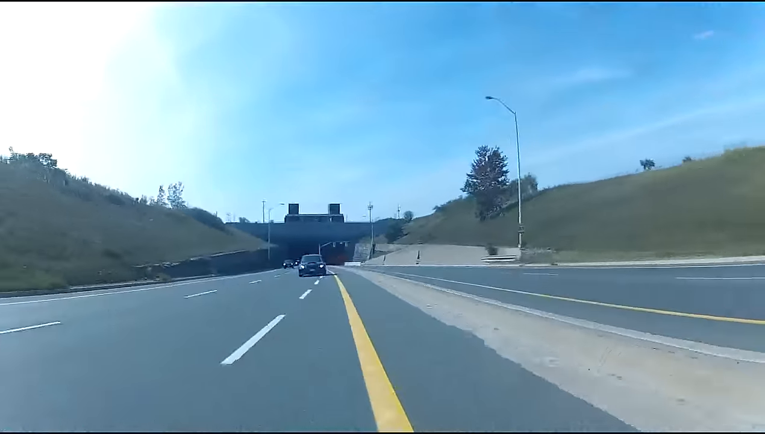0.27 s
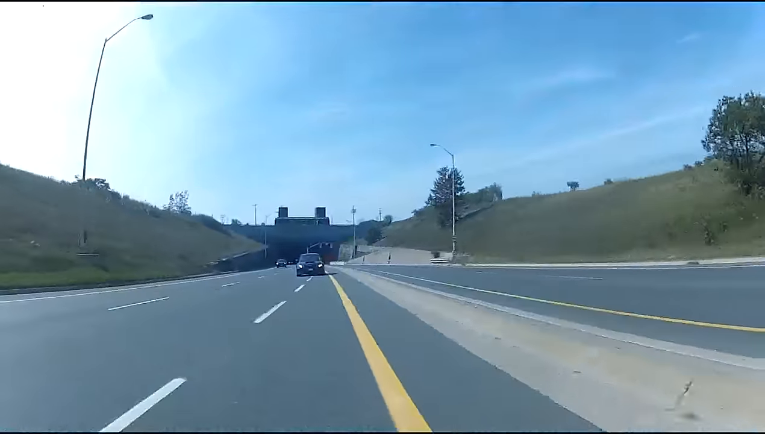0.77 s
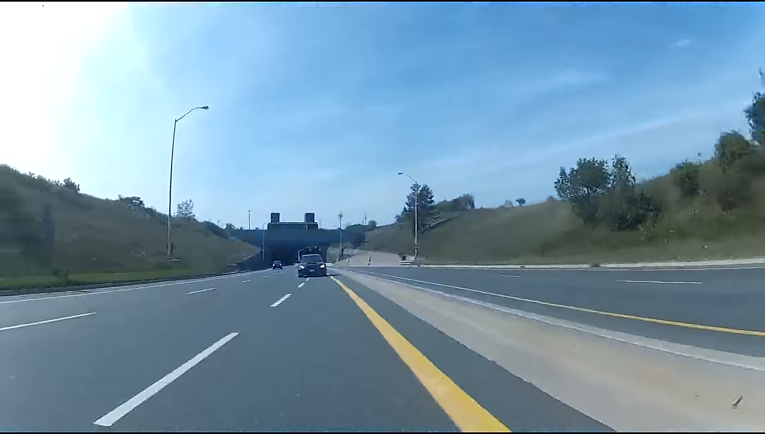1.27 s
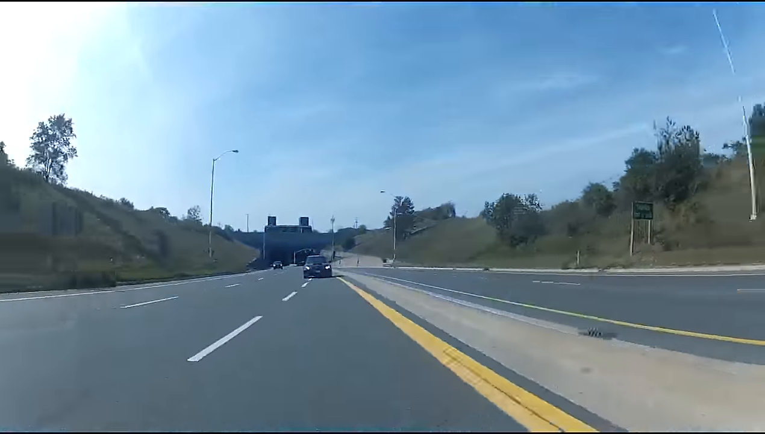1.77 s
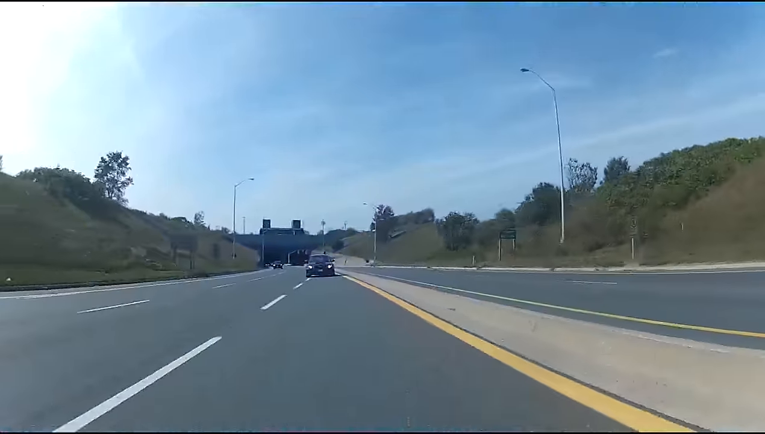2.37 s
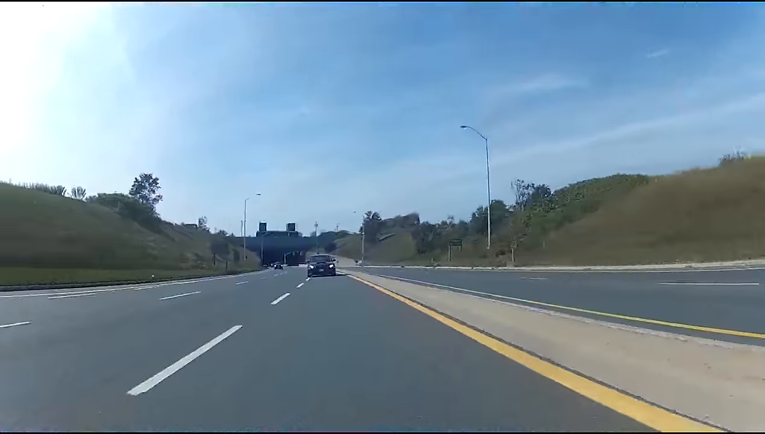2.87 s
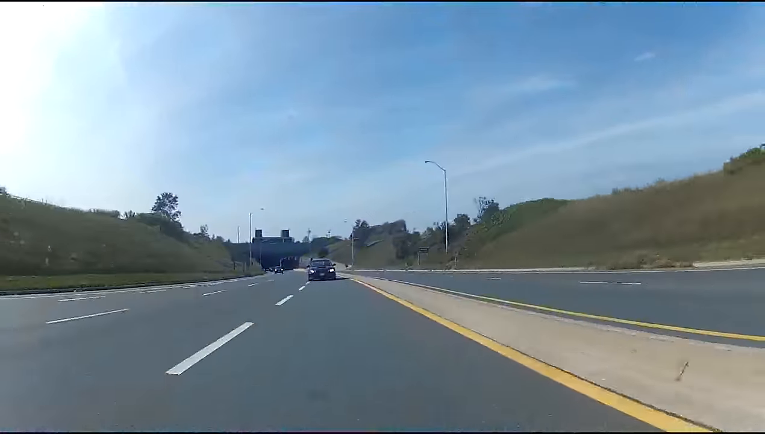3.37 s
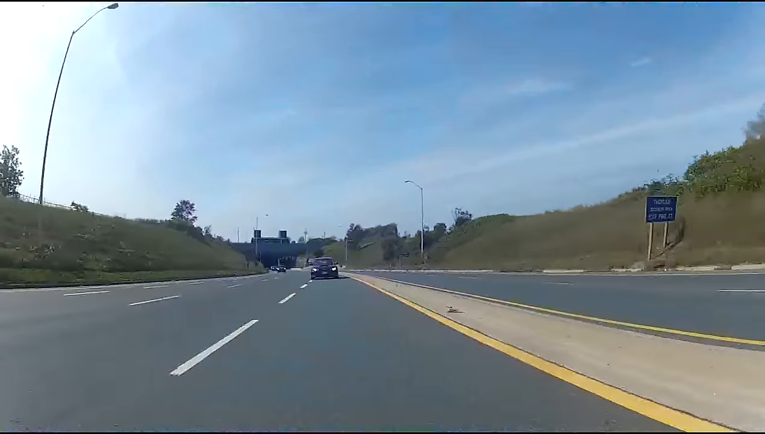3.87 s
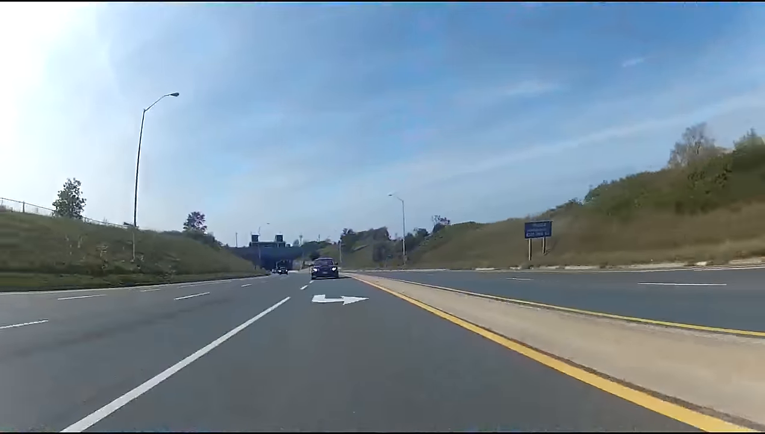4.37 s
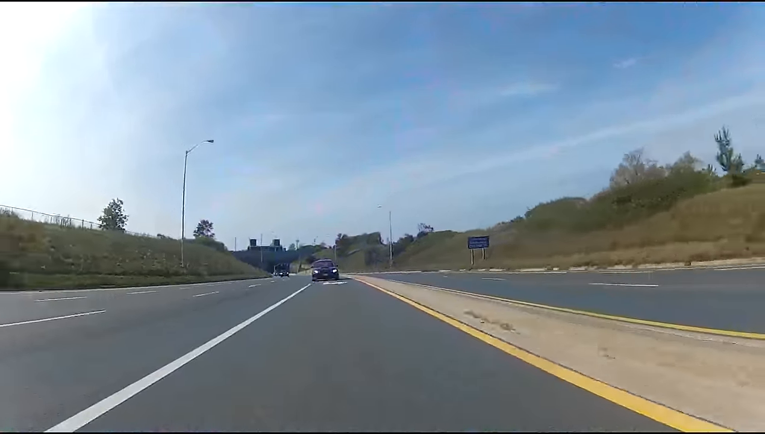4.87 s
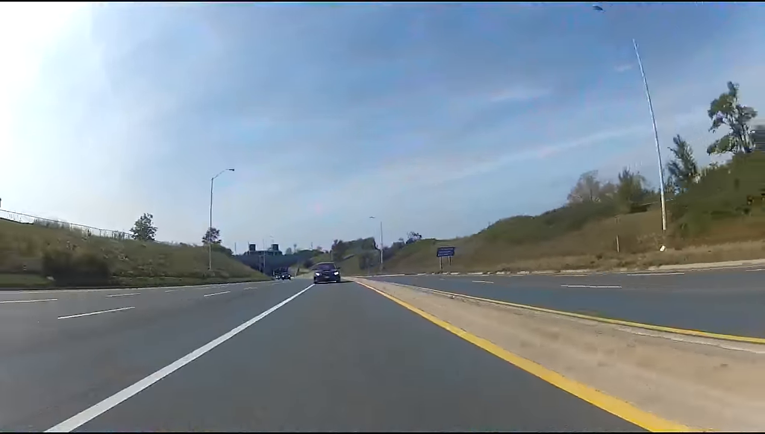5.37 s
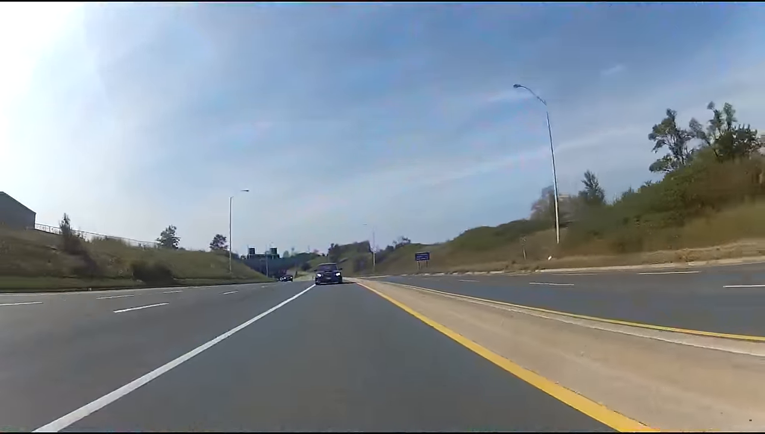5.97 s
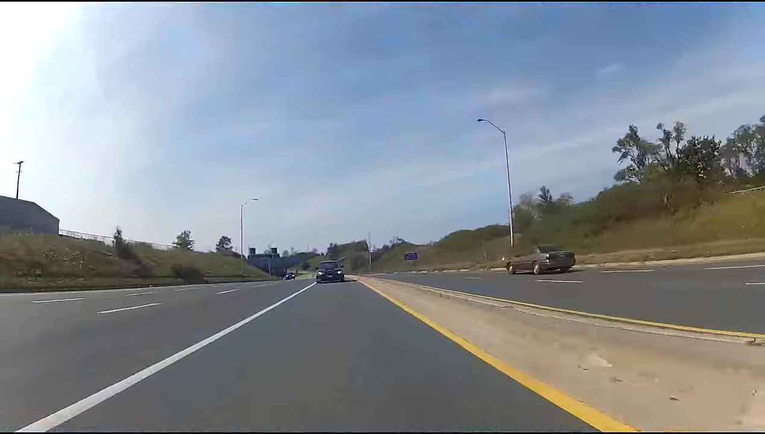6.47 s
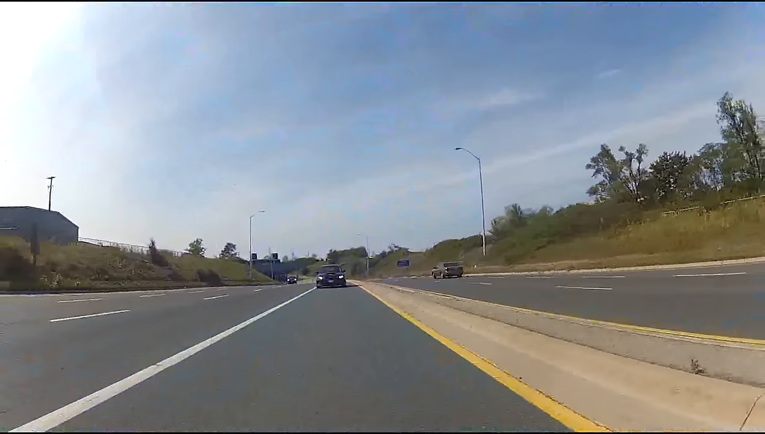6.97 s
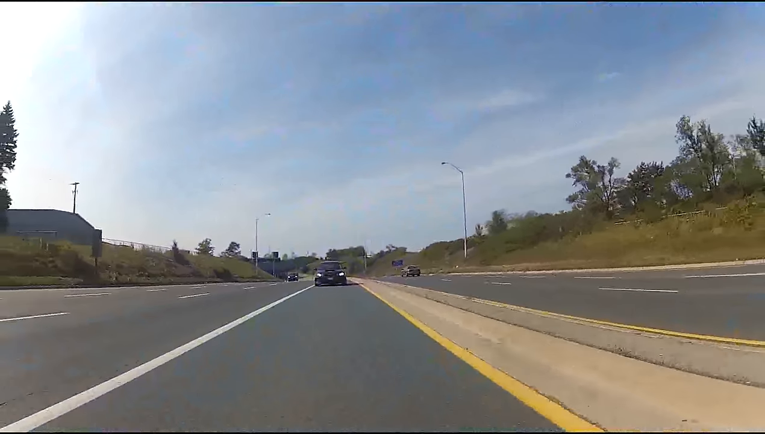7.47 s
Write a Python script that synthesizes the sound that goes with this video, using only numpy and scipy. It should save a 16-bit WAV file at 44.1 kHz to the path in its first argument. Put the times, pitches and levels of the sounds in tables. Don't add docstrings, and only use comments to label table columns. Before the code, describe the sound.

A car slows on a highway: deep buffeting boom, tyre and wind roar, humming engine, hollow exhaust pops, mount rattles, all muffled and gritty.

```python
import sys
import numpy as np
from scipy import signal
from scipy.fft import rfft, irfft, next_fast_len
from scipy.io import wavfile
from scipy.ndimage import uniform_filter1d

SR = 44100
rng = np.random.default_rng(int(sys.argv[2]) if len(sys.argv) > 2 else 0)


def to_wav(s):
    ch = np.atleast_2d(s).T
    pcm = np.round(np.clip(ch, -1, 1) * 32767)
    wavfile.write(sys.argv[1], SR, pcm.astype(np.int16))


def nominal_scale(level):
    x = np.asarray(level, float) / 20
    return 10 ** x


N = 341334
PADDED = next_fast_len(N)
HZ = np.arange(PADDED // 2 + 1) * SR / PADDED

# time in seconds, road speed in m/s.
SPEED = [
    (0, 30),
    (.4, 29.66),
    (1.4, 28.09),
    (1.7, 27.64),
    (2.4, 26.82),
    (3, 26.12),
    (4.15, 23.94),
    (5.15, 21.59),
    (7.15, 14.09),
    (7.74, 11.9),
]
# time in seconds, level in dB, pitch in Hz.
POPS = [(0.108, -24.5, 485), (0.215, -30.5, 506), (0.724, -25.5, 530), (1.029, -28.5, 474),
        (1.185, -27, 600), (1.769, -23, 456), (1.978, -26, 604), (2.063, -26.5, 513), (2.473, -26.5, 473),
        (2.566, -27.5, 470), (3.058, -24, 536), (3.171, -31, 540), (3.547, -28.5, 610), (3.785, -27.5, 496),
        (4.363, -31, 490), (4.708, -27.5, 640), (4.845, -35, 440), (4.884, -28, 649), (4.933, -32.5, 493),
        (4.973, -27.5, 590), (5.059, -27, 750), (5.153, -33.5, 463), (5.3, -26.5, 624)]
# frequency in Hz, level in dB, 60 dB decay in seconds.
SHELL_MODES = [(2330, 12, .013), (2750, 10, .008)]
# frequency in Hz, level in dB, 60 dB decay in seconds.
SHELL_FRONT = [(3200, 4, .005), (3750, 3, .005), (4250, 0, .005)]


def curves(table):
    s, *columns = np.transpose(table)
    return [np.interp(np.arange(N) / SR, s, column) for column in columns]


def walk(rate):
    hold = int(SR / rate)
    steps = np.repeat(rng.standard_normal(N // 200), hold)[:N]
    return 1.3 * uniform_filter1d(uniform_filter1d(steps, hold), hold)


def swells(events, width_s):
    t = np.arange(0, N / SR + .01, .002)
    rise_db = sum(db * np.exp(-((t - s) / width_s) ** 2) for s, db in events)
    return np.interp(np.arange(N) / SR, t, rise_db)


def with_speed(full_db, db_per_db):
    return full_db + db_per_db * 20 * np.log10(curves(SPEED)[0] / SPEED[0][1])


def turbulence(colour, swell_db, flicker_db, flicker_hz):
    hz, db = np.transpose(colour)
    octave, corners = np.log2(HZ + 1), np.log2(hz)
    noise = rfft(rng.standard_normal(PADDED)) * nominal_scale(np.interp(octave, corners, db, -150, -150))
    swell = swell_db * walk(2 * flicker_hz)
    spacing = .75
    out = 0
    for centre in np.arange(4, 14, spacing):
        if corners[0] - spacing < centre < corners[-1] + spacing:
            share = np.cos(np.pi / 2 * np.clip((octave - centre) / spacing, -1, 1)) ** 2
            band = irfft(noise * share)[:N]
            out = out + nominal_scale(swell + flicker_db * walk(flicker_hz)) * band
    return out / out.std()


def ring(push, modes):
    out = 0
    for hz, db, t60 in modes:
        pole = np.exp(2j * np.pi * hz / SR - np.log(1000) / (t60 * SR))
        out = out + nominal_scale(db) * signal.lfilter([1], [1, -pole], push).imag
    return out


def knock(s, db, modes, contact_s):
    push = np.zeros(N)
    push[(np.atleast_1d(s) * SR).astype(int)] = nominal_scale(db)
    shape = np.hanning(int(contact_s * SR) + 3)
    return ring(np.convolve(push, shape / shape.sum())[:N], modes)


def bursts(times, dbs, decay_s, delay_s):
    marks = np.zeros(N)
    marks[((times + delay_s) * SR).astype(int)] = nominal_scale(dbs)
    fade = np.exp(-1 / (decay_s * SR))
    return signal.lfilter([np.sqrt(1 - fade ** 2)], [1, -fade], marks) * rng.standard_normal(N)


def body_boom():
    # frequency in Hz, density in dB per Hz.
    fast_colour = [(12, -32), (30, -6.5), (52, -3), (72, 6.5), (98, -5.5), (125, -2.5), (160, -28.5),
                   (280, -120)]
    # frequency in Hz, density in dB per Hz.
    slow_colour = [(12, -34), (20, -18), (35, -11), (48, -3), (62, -2.5), (80, -19), (110, -7.5),
                   (150, -25)]
    # time in seconds, boom change in dB.
    boom_changes = [(0, 8), (.22, 5), (.48, 7), (.8, 4.5), (1.06, 4.5), (1.2, 2.5), (1.41, 3), (1.58, 2.5),
                    (1.75, 2.5), (1.95, 8), (2.25, 5.5), (2.45, 5), (2.58, 7), (2.8, 3), (3.35, 3.5), (3.55, 4),
                    (3.83, 4.5), (4.21, 5.5), (4.42, 5.5), (4.73, 6), (4.88, -7), (5, 10), (5.13, 1.5),
                    (5.28, 5.5), (5.47, 5.5), (6.3, 0), (6.9, 7), (7.48, 5)]
    sink_below, sink_over = 22.2, 1.9
    slow = .87 * np.clip((sink_below - curves(SPEED)[0]) / sink_over, 0, 1)
    boom = np.sqrt(1 - slow) * turbulence(fast_colour, 0.2, 0.85, 4)
    boom = boom + np.sqrt(slow) * turbulence(slow_colour, .3, 0.92, 4)
    return nominal_scale(with_speed(-24, 1.48) + swells(boom_changes, width_s=0.09)) * boom


def buffeting():
    # frequency in Hz, density in dB per Hz.
    wake_colour = [(60, -15), (95, -3), (140, -0.5), (180, 0.5), (220, -8.5), (260, -19.5), (340, -31)]
    # time in seconds, change in dB.
    rumble_changes = [(.17, 2.5), (.64, 6), (1.36, 1), (2.6, 5.5), (3.08, 6), (3.54, -3.5), (4.33, 3.5), (4.63, 9),
                      (4.89, 4.5), (5.13, 7), (5.3, 3.5), (5.86, 4.5), (6, 2.5), (6.81, -1), (7.48, 8), (7.62, 9)]
    level_db = with_speed(-25, 1.83) + swells(rumble_changes, width_s=0.053)
    return nominal_scale(level_db) * turbulence(wake_colour, 0.24, .6, 5.9)


def tyres_and_wind():
    # frequency in Hz, density in dB per Hz.
    roar_colour = [(450, -24.5), (620, -7), (800, 0), (1050, -0.5), (1250, -3.5), (1430, -3.5),
                   (1700, -13.5), (2400, -44)]
    # frequency in Hz, density in dB per Hz.
    hiss_colour = [(900, -32), (1500, -4), (1950, 0), (2500, -10.5), (3200, -21), (4200, -24),
                   (5400, -32.5), (6000, -45.5)]
    # time in seconds, tyre roar change in dB.
    asphalt = [(.15, 1), (.9, -0.5), (1.2, 1), (1.95, 0.5), (2.65, -1.5), (3.1, 0.5), (3.45, 1), (3.75, -1),
               (4.15, -0.5), (4.55, 0.5), (5.1, 1), (5.6, -0.5), (6.8, 1), (7.2, 1), (7.7, 2.5)]
    asphalt_db = swells(asphalt, width_s=0.16)
    roar = nominal_scale(with_speed(-34.5, 2.25) + asphalt_db) * turbulence(roar_colour, 0.87, 0.8, 12)
    hiss = nominal_scale(with_speed(-39, 2.08) + 0.4 * asphalt_db) * turbulence(hiss_colour, 0.42, 0.57, 14)
    return roar + hiss


def revs():
    high_gear, low_gear = 4.45, 6.6
    shift_s, blip_s, clutch_s, sag_over_s = 1.7, .215, 7.3, .22
    t = np.arange(N) / SR
    engaged = 1 - np.exp(-(np.maximum(t - shift_s, 0) / blip_s) ** 1.4)
    sag_hz = 10 * (1 - np.exp(-(np.maximum(t - clutch_s, 0) / sag_over_s) ** 2))
    return curves(SPEED)[0] * (high_gear + (low_gear - high_gear) * engaged) - sag_hz


def engine():
    # time in seconds, firing line in dB.
    load = [(0, -26), (.4, -24), (.9, -33), (1.4, -28.5), (1.6, -49), (2.3, -38), (2.42, -26.5), (3.2, -22),
            (3.8, -32.5), (4, -26.5), (4.5, -24), (5.2, -24), (5.55, -25.5), (6.05, -41.5), (6.55, -31.5),
            (6.8, -23), (7.3, -27.5), (7.74, -34)]
    # time in seconds, change of the firing line in dB.
    throttle = [(.13, -4.5), (.64, -4), (1.15, -3), (1.87, 17.5), (3.78, -8), (3.88, -2.5), (5.38, -10),
                (5.67, -4), (5.87, 6), (6.26, 7), (6.58, -4), (6.96, -4.5), (7.44, -13), (7.6, 4)]
    # order in fifths of the firing rate, start in seconds, end in seconds, level in dB.
    side_orders = [(2, 2.3, 2.7, -28), (2, 5.3, 6.6, -34), (6, 2.8, 3.5, -37), (9, 3.5, 4.4, -46),
                   (10, 1.77, 1.9, -36), (10, 3.3, 3.9, -48), (10, 4.7, 5.3, -52), (10, 5.3, 6.2, -48),
                   (10, 6.7, 7.74, -48), (11, 5.8, 6.4, -55), (12, 4.8, 5.3, -51), (12, 5.8, 6.9, -49),
                   (14, 2.4, 4.4, -54), (14, 5.2, 7.2, -56), (15, 5.8, 7.45, -48), (15, 6.8, 7.4, -52),
                   (17, 5.2, 5.9, -51), (19, 6, 6.5, -55), (20, 6.1, 6.8, -53), (24, 2.6, 4.1, -54),
                   (27, 5.5, 7.2, -56), (27, 5.9, 6.7, -54)]
    # frequency in Hz, density in dB per Hz.
    gas_colour = [(200, -17), (260, -0.5), (360, -3.5), (460, -1.5), (560, -3), (680, -4.5), (760, -26),
                  (1000, -38)]
    t = np.arange(N) / SR
    phase = 2 * np.pi * np.cumsum(revs() * (1 + .003 * walk(25))) / SR
    hum = nominal_scale(curves(load)[0] + swells(throttle, width_s=.06) + 1.22 * walk(16)) * np.sin(phase)
    waver_db = 1.8 * walk(9)
    for fifths, start, end, db in side_orders:
        span = slice(int(start * SR), int(end * SR))
        swell = np.abs(np.sin(np.pi * (t[span] - start) / (end - start))) ** .6
        own_db = db + np.roll(waver_db, fifths * 9999)[span]
        hum[span] += swell * nominal_scale(own_db) * np.sin(fifths * phase[span] / 5)
    puffs_db = swells([(s, .5 * (db + 30.5)) for s, db, _ in POPS], width_s=0.029)
    gas = nominal_scale(with_speed(-38, 1.46) + puffs_db) * turbulence(gas_colour, 0.29, 0.94, 12)
    return np.sqrt(2) * hum + gas * (1 + 0.36 * np.cos(phase))


def pops():
    rise_s, decay_s = 0.00075, 0.0039
    t = np.arange(1500) / SR
    envelope = 2 * (1 - np.exp(-t / rise_s)) * np.exp(-t / decay_s)
    out = np.zeros(N)
    for s, db, hz in POPS:
        i = int(s * SR)
        out[i:i + len(t)] += nominal_scale(db) * np.sin(2 * np.pi * hz * t) * envelope
    s, db, _ = np.transpose(POPS)
    return out + knock(s, db - 27, SHELL_MODES + SHELL_FRONT, contact_s=.0001)


def mount():
    # time in seconds, chatter in dB, thud in dB.
    rattles = [(0.59, -52.5, -53), (0.6087, -42.5, -18), (0.6502, -42, -19.5), (0.7344, -43.5, -30.5),
               (0.7801, -47.5, -19), (0.8172, -48.5, -28), (0.865, -52.5, -32), (1.003, -56, -48),
               (1.4366, -52, -29), (1.628, -41, -25.5), (1.6664, -49, -22.5), (1.864, -54, -26),
               (1.956, -40.5, -27), (2.951, -56.5, -32), (3.037, -40.5, -21.5), (4.567, -46, -33),
               (4.606, -43.5, -17), (4.6476, -51, -28), (4.8394, -46.5, -25), (5.463, -47, -37),
               (5.5044, -49, -49), (6.775, -47.5, -59), (6.8157, -53, -34), (6.859, -62.5, -39),
               (6.956, -50, -31.5), (7.199, -51.5, -38), (7.2953, -60.5, -45)]
    # frequency in Hz, level in dB, 60 dB decay in seconds.
    chatter_modes = [(2350, 2, 0.024), (2840, 4, 0.014), (3760, -1.5, 0.0088), (4200, -0.5, 0.014),
                     (4750, -0.5, 0.02), (5090, -1.5, 0.019), (5370, -9, .04), (5900, -6.5, 0.0072)]
    # frequency in Hz, level in dB, 60 dB decay in seconds.
    thud_modes = [(481, -2, 0.06), (560, 3, .04), (672, 3.5, 0.052), (790, -7.5, 0.024), (1270, -12, .04),
                  (1970, -8, 0.044)]
    s, chatter_db, thud_db = np.transpose(rattles)
    chatter = ring(bursts(s, chatter_db + 1.5, decay_s=0.011, delay_s=0), chatter_modes)
    thud = ring(bursts(s, thud_db - 8, decay_s=0.006, delay_s=.006), thud_modes)
    return chatter + thud


def grit():
    # time in seconds, level in dB.
    hits = [(2.1038, -27), (2.2257, -33), (2.89, -30), (4.0617, -35.5), (5.2769, -37.5), (5.4254, -38),
            (5.6321, -38.5), (5.7245, -48), (5.9329, -42), (6.0446, -42), (6.2476, -45), (6.3753, -41.5),
            (6.4087, -48), (6.501, -47), (6.73, -42), (7.3527, -49), (7.453, -49)]
    s, db = np.transpose(hits)
    ticks = knock(s + .0009, db - 3, SHELL_FRONT, contact_s=.0002)
    ticks = ticks + knock(s + .0016, db - 3, SHELL_MODES, contact_s=.0004)
    ticks = ticks + knock(s + .0045, db - 12, SHELL_MODES, contact_s=.0004)
    return signal.sosfilt(signal.butter(8, 4600, fs=SR, output="sos"), ticks)


def passing_car():
    # frequency in Hz, density in dB per Hz.
    far_colour = [(400, -7), (1000, 1), (2000, 1.5), (2800, -1), (3500, -14.5), (4500, -15.5), (5500, -18),
                  (6000, -28)]
    passes_s, pass_width_s = 6.35, 0.48
    distance = np.hypot(1, (np.arange(N) / SR - passes_s) / pass_width_s)
    return nominal_scale(-47.5) / distance ** 3.9 * turbulence(far_colour, .4, 1.1, 16)


def scene():
    road = body_boom() + buffeting() + tyres_and_wind()
    mix = road + engine() + pops() + mount() + grit() + passing_car()
    fades = np.minimum(np.arange(N) / 150, np.arange(N)[::-1] / 400)
    return (np.clip(fades, 0, 1) * mix)[None]


def closed_case(x):
    # frequency in Hz, width in Hz, gain in dB.
    resonances = [(729, 45, -9), (886, 17.5, -15), (923, 41, 6), (1609, 130, -12.5), (2263, 51, 6),
                  (3622, 64, 9), (4570, 140, -6.5), (4770, 48, -0.5), (5170, 60, 1.5), (5400, 40, 4.5)]
    case_db = sum(db / (1 + (2 * (HZ - hz) / width) ** 2) for hz, width, db in resonances)
    inside = irfft(rfft(x, PADDED) * nominal_scale(case_db))[:N]
    return np.tanh(0.85 * inside) / 0.74


def converter(x):
    slow = signal.resample_poly(x, 40, 147)
    held = signal.resample_poly(np.repeat(slow, 4), 147, 160)[:N]
    return held + nominal_scale(-74.0) * rng.standard_normal(N)


def band_dropouts(x):
    # lower edge in Hz, upper edge in Hz, share of moments left empty.
    faint_bands = [(5650, 5850, .35), (5850, 6150, .6), (6150, 6380, .35)]
    spectrum = rfft(x, PADDED)
    loud = uniform_filter1d(x ** 2, SR // 2) > nominal_scale(-50)
    for low_hz, high_hz, share in faint_bands:
        band = irfft(spectrum * ((HZ >= low_hz) & (HZ < high_hz)))[:N]
        quiet = uniform_filter1d(band ** 2, 1024) < 4.4 * np.median(band ** 2)
        empty = (walk(16) < 2.5 * (share - .5 - .3 * ~loud)) & quiet
        x = x - band * uniform_filter1d(1. * empty, 500)
    return x


def low_pass(x):
    return signal.sosfilt(signal.butter(12, 15450, fs=SR, output="sos"), x)


def record(dry):
    held = band_dropouts(converter(closed_case(dry[0])))
    limited = signal.sosfilt(signal.ellip(8, .2, 24, 15250, fs=SR, output="sos"), held)
    return low_pass(limited[None])


dry = scene()
out = record(dry)
to_wav(out)
```